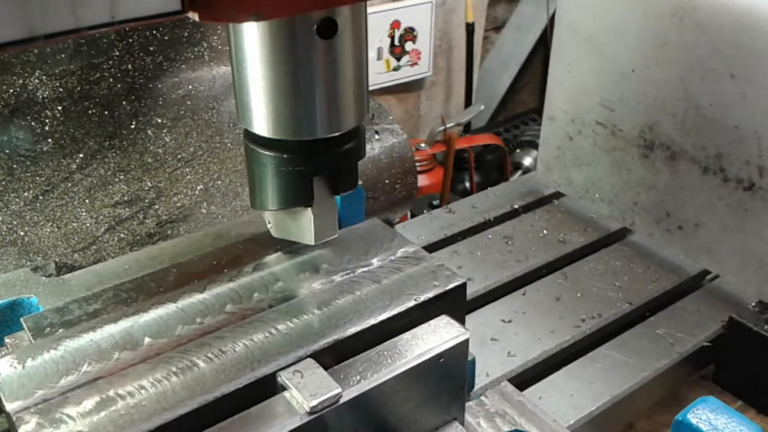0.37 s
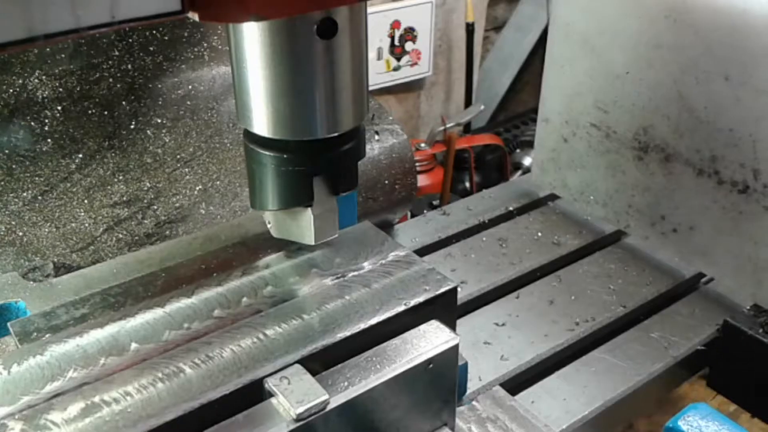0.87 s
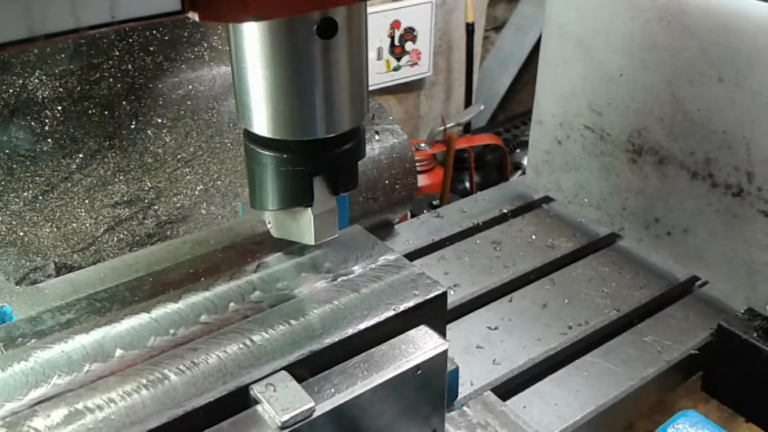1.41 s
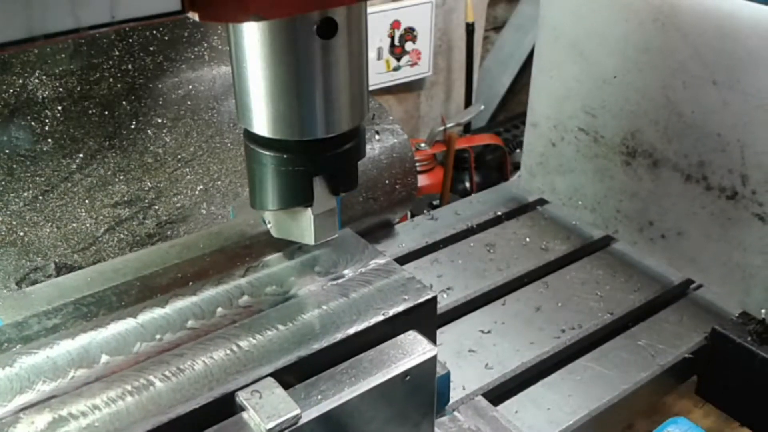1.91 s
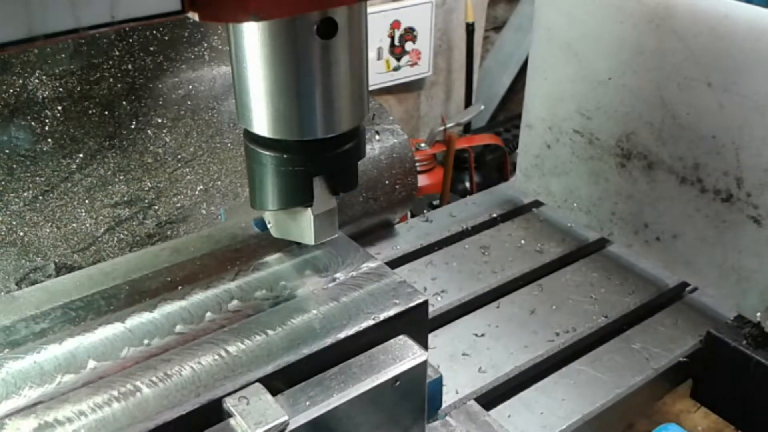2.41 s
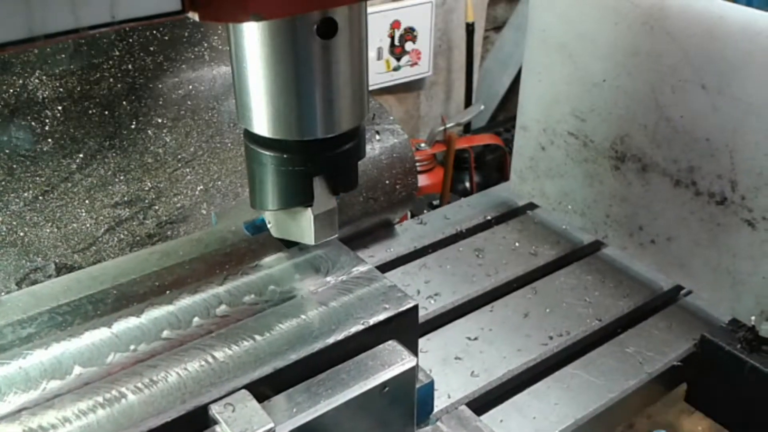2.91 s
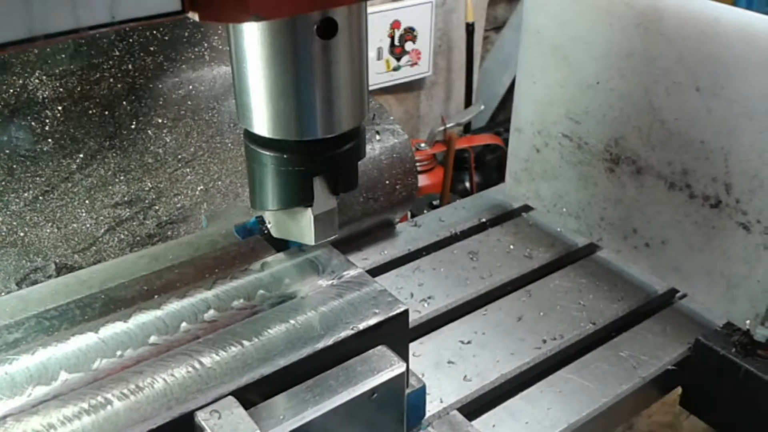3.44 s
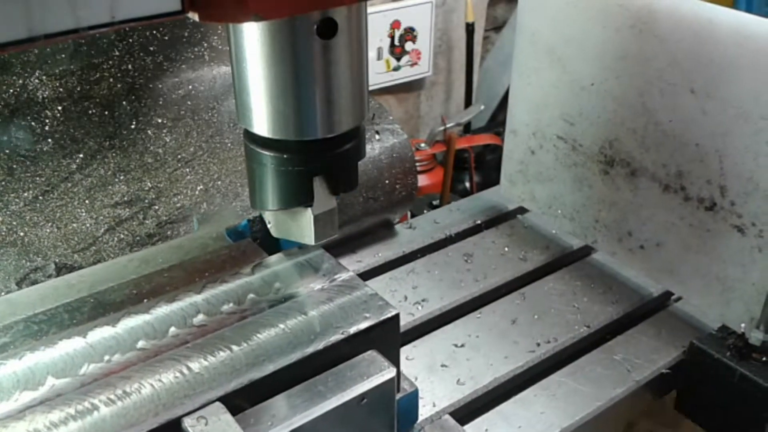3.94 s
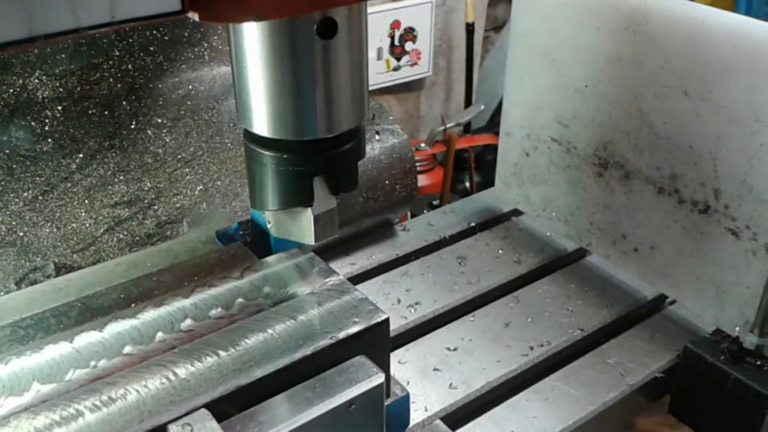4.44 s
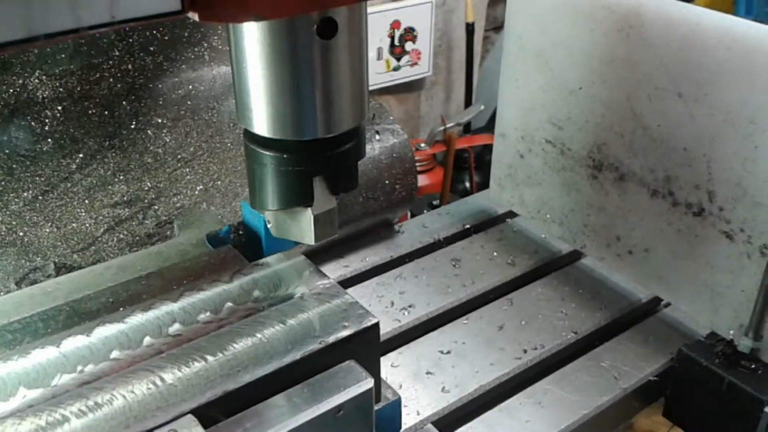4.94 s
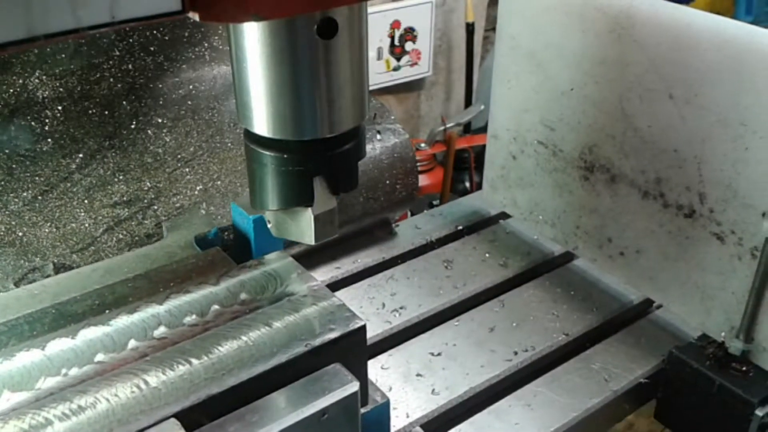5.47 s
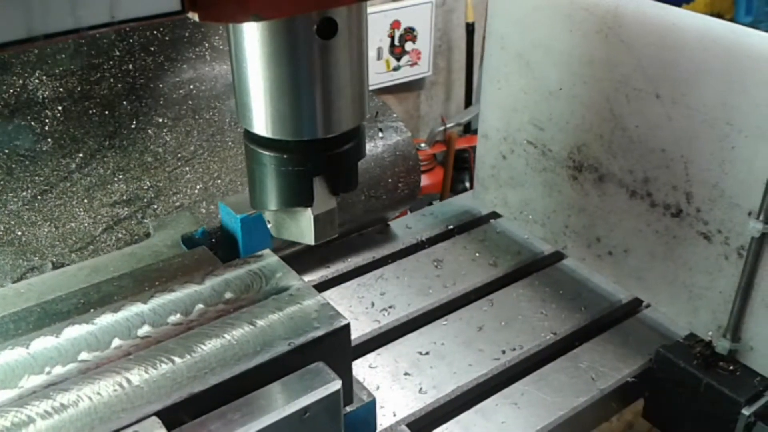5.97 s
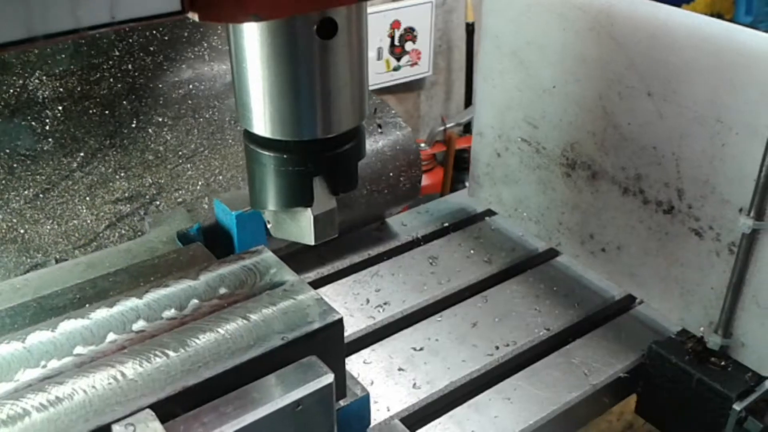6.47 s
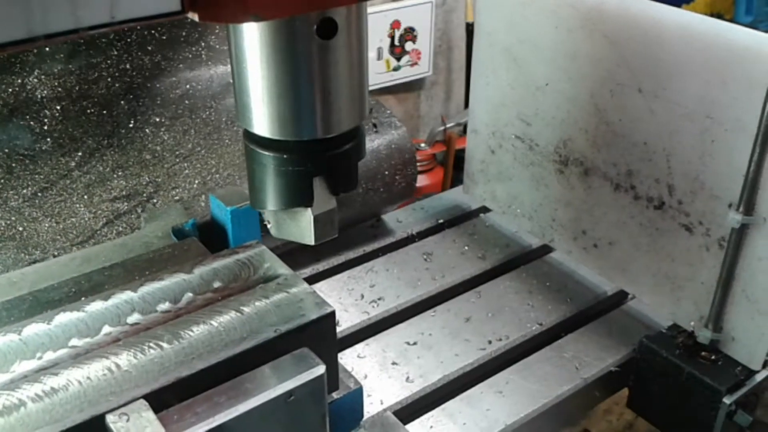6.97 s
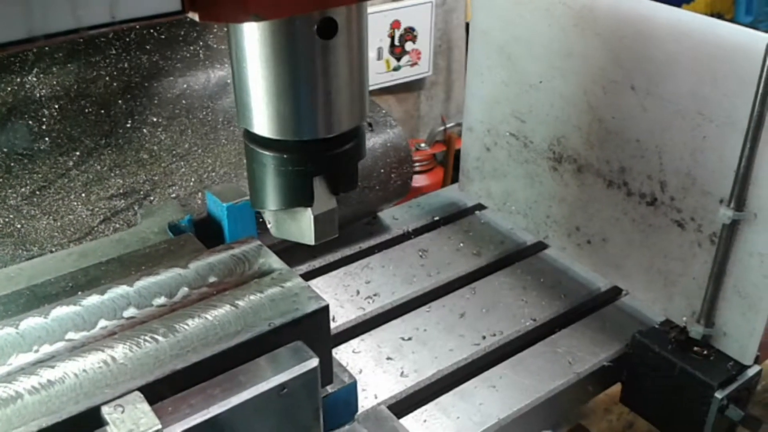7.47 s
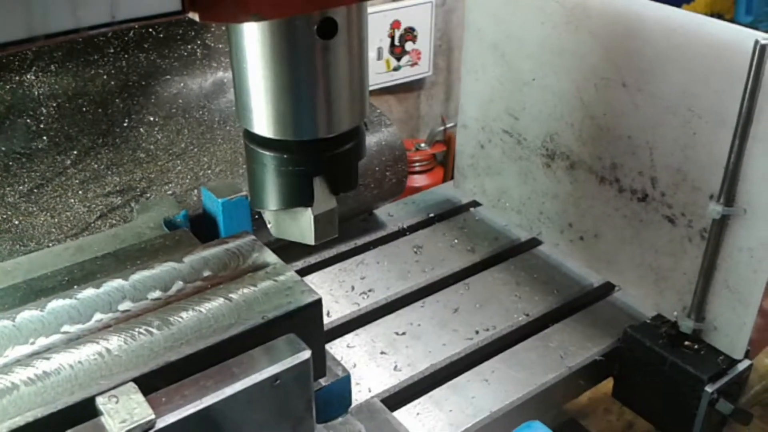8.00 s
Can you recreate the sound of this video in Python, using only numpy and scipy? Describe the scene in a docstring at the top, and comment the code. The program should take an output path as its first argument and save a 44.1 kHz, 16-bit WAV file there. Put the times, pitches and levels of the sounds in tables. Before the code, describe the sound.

Close to a small milling machine, steel parts clack unevenly throughout while the table winds with faint rumble, scraping hiss and one brief squeal.

```python
"""In a workshop with a steady broad drone, a phone close to a small milling machine; the table is wound under the cutter.
From the start steel parts clack irregularly, bright ticks and duller knocks: noise chatter ringing steel modes.
Under them lie faint recorder hiss, the feed screw's rumble (thumps in casting modes) and the slideway's gritty hiss.
At about 1.5 s a thin squeal, a gliding sine with its octave, slides down; the slideway hiss is strongest near 5 s.
From about 6.2 s the rumble nearly goes, and it comes back towards the end; the clacks go on throughout."""
import sys
import numpy as np
from scipy import signal
from scipy.fft import rfft, irfft
from scipy.io import wavfile
from scipy.ndimage import uniform_filter1d, minimum_filter1d

SR = 44100
rng = np.random.default_rng(int(sys.argv[2]) if len(sys.argv) > 2 else 0)


def put_to_file(sound):
    """Save the sound as 16-bit audio at rate SR, in the file named by the first command-line argument."""
    columns = np.atleast_2d(sound).T  # one column per channel
    safe = np.clip(columns, -1, 1)
    whole_steps = np.round(safe * 32767)
    wavfile.write(sys.argv[1], SR, whole_steps.astype(np.int16))


def gain_from_db(level_db):
    """Convert decibel levels to linear amplitude factors (20 dB per decade)."""
    decades = np.asarray(level_db, float) / 20
    return 10 ** decades


N = 358082  # samples

# steady background: workshop drone, with faint recorder hiss at the top ending near 15 kHz:
# f/Hz, relative density level/dB
BACKGROUND_SPECTRUM = [(20, -12), (60, -11), (200, -3), (400, -6), (700, -7), (2900, -17), (5000, -6.5),
                       (7000, -21), (12000, -27.5), (14800, -22), (15200, -65)]
# broad resonances of the slideway: f/Hz, nominal width/Hz, relative level/dB
SLIDEWAY_MODES = [(2080, 1800, -9), (4570, 930, 6.5), (5480, 450, 5), (7700, 1900, -7.5),
                  (13000, 1500, -19.5)]
# slideway hiss as the table is wound: t/s, level/dB
HISS_LEVEL = [(0.12, -46.5), (0.56, -38), (1.0, -51), (1.58, -47), (2.24, -53), (2.64, -35.5), (2.8, -38),
              (2.95, -57), (3.93, -61), (4.06, -37), (4.45, -44.5), (4.73, -43), (5.06, -33), (5.49, -36),
              (5.9, -47), (6.07, -47), (6.7, -43), (7.29, -56), (8.08, -37)]
# glide of the squeal before its waver: t/s, f/Hz, level/dB
SQUEAL_GLIDE = [(1.46, 4480, -90), (1.5, 4450, -59), (1.62, 4240, -47), (1.65, 4300, -90)]
# low modes of the casting: f/Hz, width/Hz, relative level/dB
CASTING_MODES = [(50, 76, -29), (116, 53, -18), (227, 46, -9.5), (383.7, 55.6, 0.5), (583, 30, -7)]
# screw rumble: t/s, level/dB, share of the deep modes/dB
RUMBLE_LEVEL = [(0.1, -47.5, 4), (0.56, -42.5, 10), (0.8, -50, 3), (1.1, -47, -0.5), (1.85, -44, 4.5),
                (2.22, -54, -4), (2.45, -49.5, -3), (2.8, -41.5, 1), (3.2, -50, -5), (3.55, -43.5, 0),
                (3.7, -55, 2), (3.95, -42.5, -4), (4.55, -42.5, 0), (5.05, -47, 3), (5.25, -40.5, -6),
                (6.0, -41.5, -10.5), (6.23, -65.5, 11), (7.3, -69, 15), (7.8, -52.5, 1), (8.08, -49, 1)]
# clacks of the steel parts: t/s, blow strength/dB, then against the blow: dull body/dB, bright edge/dB
CLACK_BLOWS = [(0.0022, -15.5, -5.5, -11), (0.1429, -14, -14, -14), (0.2004, -21, -10, -4.5),
               (0.213, -9, -7.5, -19), (0.3932, -15.5, -13.5, -5.5), (0.4461, -18, -12, -6),
               (0.4675, -11, -6, -13), (0.5882, -11, -16, -9.5), (0.6665, -28.5, -6, -24),
               (0.6852, -13.5, 1.5, -46), (0.8359, -20.5, -1.5, -11.5), (0.9173, -20, -20, -33),
               (0.9388, -17, 0, -41), (0.9586, -30, -11, -19), (0.97, -27, -21, -23),
               (1.1147, -32.5, -22, -25), (1.1436, -7, -19, -3), (1.209, -10, -4, -31),
               (1.3602, -29, -18, -7), (1.375, -16.5, -7.5, -12), (1.4526, -12.5, -2, -54),
               (1.6522, -7.5, -16, -4), (1.735, -32.5, 6, -33), (1.8942, -30, -24, -25),
               (1.927, -4, -17, -5.5), (2.0093, -12.5, -5.5, -17.5), (2.1385, -20.5, -11, -18),
               (2.2783, -15.5, 1, -43), (2.417, -15, -15, -6), (2.568, -22, 0, -17), (2.675, -14, -15, -10),
               (2.7057, -30, -18, -10), (2.7339, -11, -17.5, -11), (2.8378, -12, -3, -17),
               (2.9594, -12.5, -23.5, -16), (2.973, -13, -15, -1.5), (3.0818, -32, -15, -30),
               (3.1271, -23, 3, -54), (3.2728, -12, -19, -9.5), (3.3936, -9.5, -6, -25),
               (3.548, -39, 1, -22), (3.5661, -12.5, -15.5, -7.5), (3.7293, -9, -10.5, -36),
               (3.8602, -29.5, -4.5, -20), (3.9679, -15, -3.5, -29), (4.0807, -26.5, -9, -28),
               (4.1132, -12, -10, -12.5), (4.145, -23, -11, -12), (4.2437, -14, -0.5, -33),
               (4.375, -9.5, -22, -14), (4.3974, -29, -3, -14), (4.521, -16, -4, -34),
               (4.5324, -20, -19, -13.5), (4.573, -10.5, -10.5, -34), (4.7883, -14, -6.5, -23),
               (4.9426, -25.5, -3, -20), (5.1265, -5.5, -8, -24.5), (5.2296, -10, -10, -11.5),
               (5.261, -21, -20, -14), (5.354, -11, -6, -33), (5.5285, -13, -8.5, -15),
               (5.669, -23, -1, -37), (5.6759, -21.5, -1, -12), (5.794, -13.5, -2.5, -18.5),
               (5.9438, -16.5, -1, -45), (5.9848, -11.5, -17, -18), (6.0933, -10.5, -7, -22),
               (6.2799, -17, -22.5, -20), (6.315, -25.5, -7, -16), (6.3759, -17.5, -0.5, -19),
               (6.566, -10.5, -22, -9), (6.6403, -19.5, -9, -8), (6.6506, -12.5, -1, -36),
               (6.708, -29, -5.5, -24), (6.8299, -10.5, -20, -9), (6.8974, -25, -4.5, -4.5),
               (6.914, -22.5, -1.5, -36), (7.0796, -11, -16, -5), (7.1643, -10, -3, -20),
               (7.2416, -26.5, -14, -11), (7.3179, -13, -13, -4), (7.419, -24.5, -14, -20),
               (7.4248, -12.5, -5, -5.5), (7.441, -17, -16, -15), (7.6001, -11, -17, -12),
               (7.687, -28, -9, -26), (7.6966, -13.5, -1, -34), (7.8792, -13, -11.5, -10.5),
               (7.9599, -16.5, 2, -37)]
# what the struck steel rings with: f/Hz, width/Hz, level/dB
STEEL_MODES = [(228, 65, -5), (387, 56.3, 2.5), (574, 44, 4), (812, 260, 0), (1054, 52.5, 6),
               (1225, 146, 3), (1575, 230, -6.5), (1874, 127, 0), (2113, 212, -1), (2343, 303, 1),
               (3002, 454, -0.5), (3483, 410, -7.5), (4204, 483, -1.5), (4535, 273, 2.5), (5030, 367, -1),
               (5300, 284, 1.5), (5688, 542, -3.5), (7560, 1380, 5.5), (8220, 950, 7), (9270, 1070, -3),
               (10090, 1240, -3), (12300, 3500, -18)]
# main, dull, bright and knock part of a clack: lowest f/Hz, highest f/Hz, ring-on t60/s
CLACK_PARTS = [(3300, 6000, 0.16), (1500, 3300, 0.17), (6500, 16000, 0.14), (200, 1500, 0.22)]
# lean to brighter or duller as the table travels: t/s, main part/(dB per octave), knock part/(dB per octave)
TRAVEL_LEAN = [(0, 20.5, -3.5), (1, 6, -0.5), (2, -2, 0.5), (3, 12.5, 0.5), (3.7, -4.5, 1), (4.5, 3.5, -2),
               (5.3, -8.5, 3), (6.1, -2, 0.5), (7, 8, 0.5), (8.1, 0.5, 1.5)]

DEEP_HZ = 300  # casting modes below this count as deep
FIRST_CONTACT_DB = 15.5  # single-sample click against the chatter
CHATTER_S, SCATTER_DB, FLUTTER_DB = 0.0027, 2.5, 1.5
# the low knock follows the dull body and fades as the table travels
KNOCK_DB, KNOCK_PER_DULL, KNOCK_DB_PER_S = -7, 0.69, -0.5
# bright and gentle blows ring on relatively more
RING_ON_DB, RING_PER_BRIGHT, RING_PER_BLOW = -5.5, 0.13, -0.11
# faint loose ticks as parts settle after a clack
LOOSE_PER_S, LOOSE_AFTER_S, LOOSE_WITHIN_S = 2, 0.02, 0.05
LOOSE_DB, LOOSE_SPREAD_DB, LOOSE_DULL_DB, LOOSE_BRIGHT_DB = -31, 3.5, -14.5, -11


def ring(x, hz, width):
    """Two-pole resonance, gain 1 at its centre."""
    return signal.lfilter(*signal.iirpeak(hz, hz / width, SR), x)


def unit(x):
    """Scale to rms 1."""
    return x / np.sqrt(np.mean(x ** 2))


def walk(rate):
    """Random levels held 1 / rate s and slewed twice; spread near 1."""
    hold = int(SR / rate)
    levels = np.repeat(rng.standard_normal(N // hold + 1), hold)
    slewed = uniform_filter1d(uniform_filter1d(levels, hold), hold)
    return 1.56 * slewed[:N]


def curve(rows, at_s, column=1):
    """Value of a column of a table at given times, straight between its rows."""
    columns = np.transpose(rows)
    return np.interp(at_s, columns[0], columns[column])


def background():
    """Workshop drone and faint recorder hiss: white noise shaped in its spectrum, its level wandering slowly."""
    f = np.fft.rfftfreq(N, 1 / SR)
    hz, db = np.transpose(BACKGROUND_SPECTRUM)
    shape = gain_from_db(np.interp(np.log(f + 1), np.log(hz), db))
    noise = irfft(rfft(rng.standard_normal(N)) * shape, N)
    return gain_from_db(-49.5) * unit(noise) * gain_from_db(1.26 * walk(5))


def hiss():
    """Grit between the slides: gritty noise in a few broad resonances."""
    grit = rng.standard_normal(N) * gain_from_db(2.3 * walk(250) + 0.27 * walk(53))
    out = np.zeros(N)
    for hz, nominal_width, db in SLIDEWAY_MODES:
        width = 1.06 * nominal_width
        out += gain_from_db(db) * ring(ring(grit, hz, width), hz, width)
    return unit(out)


def squeal():
    """A thin, wavering squeal with its octave, sliding down a little."""
    s, hz, db = np.transpose(SQUEAL_GLIDE)
    t = np.arange(N) / SR
    pitch = np.interp(t, s, hz) * (1 + 0.004 * walk(60))
    phase = 2 * np.pi * np.cumsum(pitch) / SR
    level = gain_from_db(np.interp(t, s, db) + 2.0 * walk(80))
    return level * (np.sin(phase) + 0.29 * np.sin(2 * phase))


def rumble():
    """The screw thread catches unevenly: small thumps reach each low mode of the casting in its own time."""
    out = np.zeros(N)
    for hz, width, db in CASTING_MODES:
        caught = rng.random(N) < 70 / SR  # 70 thumps per second on average
        thumps = caught * rng.standard_normal(N)
        rub = 0.014 * rng.standard_normal(N)
        force = (thumps + rub) * gain_from_db(3.0 * walk(11))
        if hz < DEEP_HZ:
            force = force * gain_from_db(curve(RUMBLE_LEVEL, np.arange(N) / SR, column=2))
        out += gain_from_db(db) * ring(ring(force, hz, 3 * width), hz, width)
    return unit(out)


def blows():
    """The clacks and the faint ticks of parts settling after them, in order of time."""
    count = int(LOOSE_PER_S * N / SR)
    loose = np.tile([LOOSE_AFTER_S, LOOSE_DB, LOOSE_DULL_DB, LOOSE_BRIGHT_DB], (count, 1))
    loose[:, 0] += rng.choice(np.transpose(CLACK_BLOWS)[0], count) + LOOSE_WITHIN_S * rng.random(count)
    loose[:, 1] += LOOSE_SPREAD_DB * rng.standard_normal(count)
    rows = np.vstack([CLACK_BLOWS, loose])
    return rows[np.argsort(rows[:, 0])].T


def shake(at, blow_db, tail_db, t60):
    """Amplitude of the shaking: a few ms of chatter at each blow, then a dying ring-on; powers add."""
    blow, tail = np.zeros(N), np.zeros(N)
    blow[at] = gain_from_db(blow_db) ** 2
    tail[at] = gain_from_db(blow_db + tail_db) ** 2
    t = np.arange(SR // 50) / SR
    chatter = np.minimum(t / 0.0001, 1) / (1 + (t / CHATTER_S) ** 6)
    chatter_power = np.abs(signal.oaconvolve(blow, chatter)[:N])
    fall = np.exp(-2 * np.log(1000) / (t60 * SR))
    # echoes arrive in clumps, so the ring-on flutters
    flutter = gain_from_db(FLUTTER_DB * walk(300)) ** 2
    ring_on_power = signal.lfilter([1], [1, -fall], tail) * flutter
    return np.sqrt(chatter_power + ring_on_power)


def clacks():
    """Every blow shakes the same modes of steel and sheet-metal guard, each a little differently."""
    s, blow_db, dull_db, bright_db = blows()
    knock_db = KNOCK_DB + KNOCK_PER_DULL * dull_db + KNOCK_DB_PER_S * s
    tail_db = RING_ON_DB + RING_PER_BRIGHT * bright_db + RING_PER_BLOW * blow_db
    at = (s * SR).astype(int)
    # index of the latest blow at every sample
    latest = np.maximum(np.searchsorted(at, np.arange(N), "right") - 1, 0)
    scatter_db = SCATTER_DB * rng.standard_normal((len(STEEL_MODES), len(at)))
    lean_column = {0: 1, 3: 2}  # only the main and the knock part lean
    out = np.zeros(N)
    for part, part_db in enumerate((0, dull_db, bright_db, knock_db)):
        lo, hi, t60 = CLACK_PARTS[part]
        force = shake(at, blow_db + part_db, tail_db, t60) * rng.standard_normal(N)
        force[at] += gain_from_db(blow_db + part_db + FIRST_CONTACT_DB)  # one hard click opens the chatter
        modes = [k for k, mode in enumerate(STEEL_MODES) if lo <= mode[0] < hi]
        # power that the modes pass from white noise
        passed = sum(gain_from_db(STEEL_MODES[k][2]) ** 2 * np.pi * STEEL_MODES[k][1] / SR for k in modes)
        for k in modes:
            hz, width, db = STEEL_MODES[k]
            gain_db = db + scatter_db[k]
            if part in lean_column:
                octaves = np.log2(hz / np.sqrt(lo * hi))
                gain_db = gain_db + curve(TRAVEL_LEAN, s, lean_column[part]) * octaves
            if 950 < hz < 1150:
                # this hollow mode answers mostly to the bright ticks
                gain_db = gain_db - 0.35 * dull_db - 3.5
            driven = force * gain_from_db(gain_db)[latest]
            wide = ring(driven, hz, min(4 * width, hz))
            # a damped share speaks at once, the rest builds up in the sharp mode
            mode_sound = ring(wide, hz, width) + 0.019 * wide
            out += (-1) ** k * mode_sound / np.sqrt(passed)
    return out


def scene():
    """Steady background, slideway, squeal and screw, with the clacks in front; one channel."""
    t = np.arange(N) / SR
    slideway = gain_from_db(curve(HISS_LEVEL, t)) * hiss()
    screw = gain_from_db(curve(RUMBLE_LEVEL, t)) * rumble()
    return (background() + slideway + squeal() + screw + clacks())[None]


def band_limit(x):
    """A steep low-pass at the top of the band."""
    return signal.sosfilt(signal.butter(12, 16370, fs=SR, output="sos"), x)


def record(dry):
    """The phone cuts the top above 16.1 kHz; a look-ahead limiter holds the loudest peaks."""
    low_pass = signal.ellip(8, 0.2, 70, 16100, fs=SR, output="sos")
    x = signal.sosfilt(low_pass, dry)
    room_left = np.minimum(1, 0.97 / (np.abs(x) + 1e-9))
    gain = uniform_filter1d(minimum_filter1d(room_left, size=200), size=200)
    return band_limit(x * gain)


dry = scene()
out = record(dry)
put_to_file(out)
```